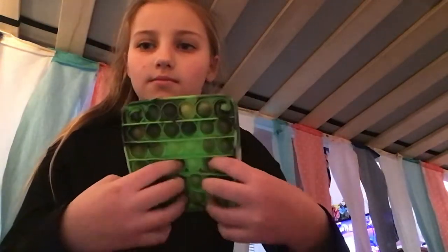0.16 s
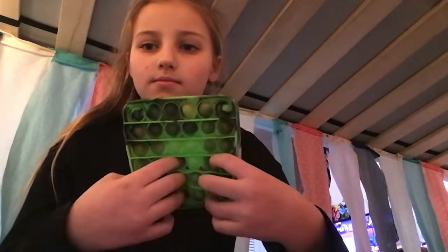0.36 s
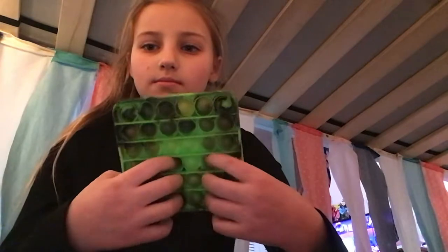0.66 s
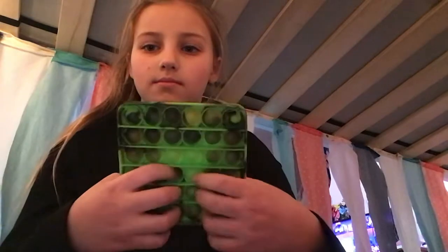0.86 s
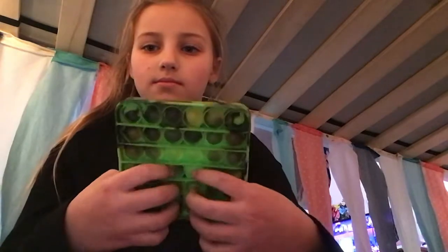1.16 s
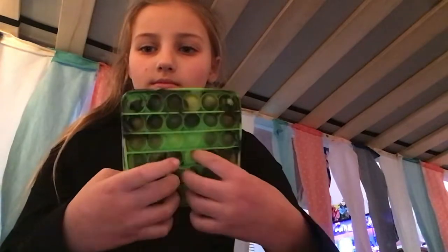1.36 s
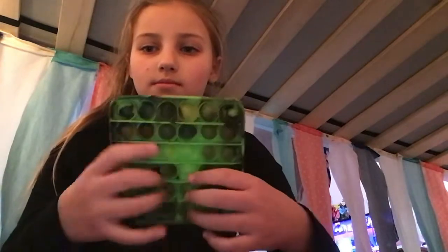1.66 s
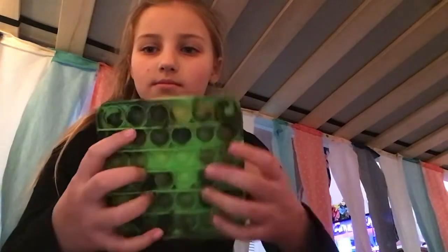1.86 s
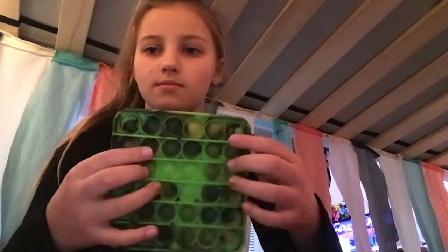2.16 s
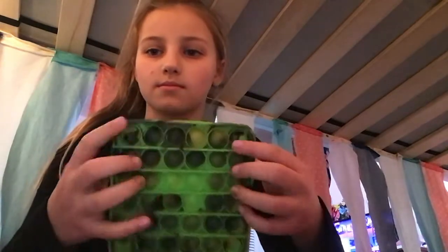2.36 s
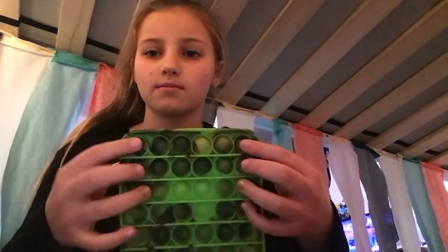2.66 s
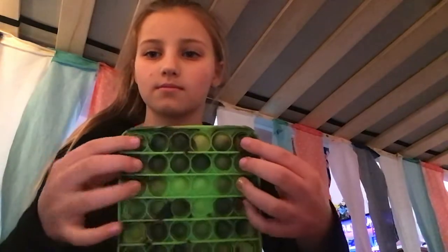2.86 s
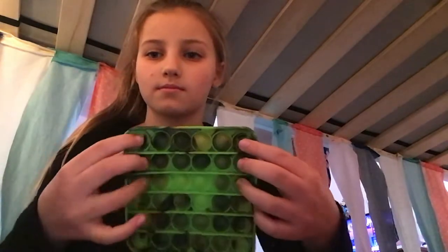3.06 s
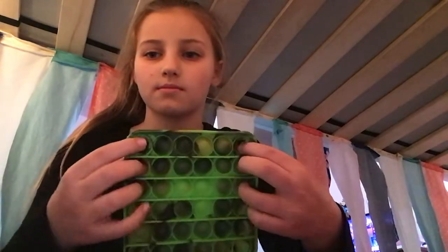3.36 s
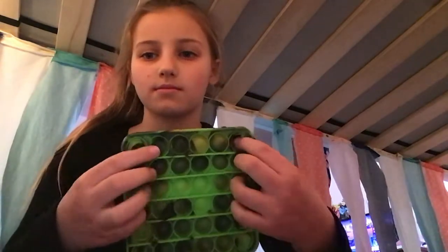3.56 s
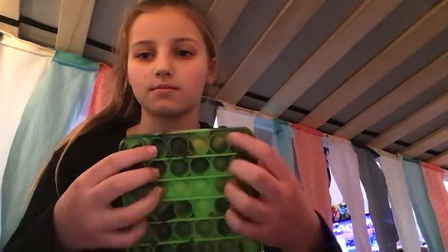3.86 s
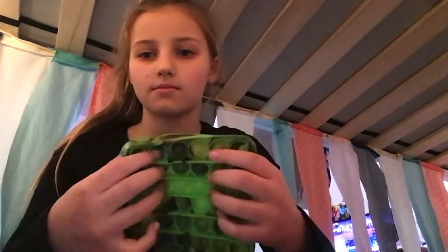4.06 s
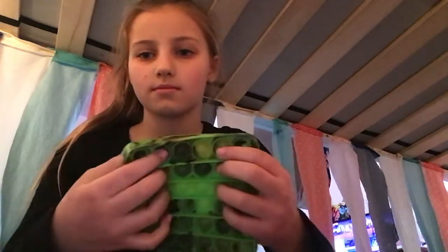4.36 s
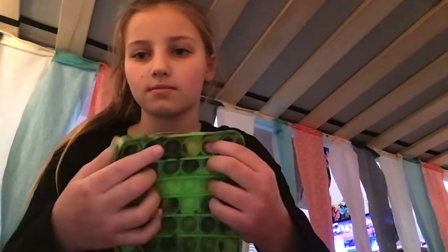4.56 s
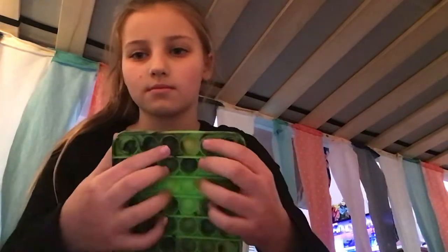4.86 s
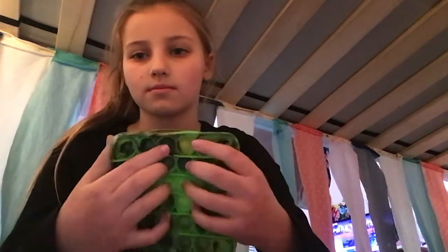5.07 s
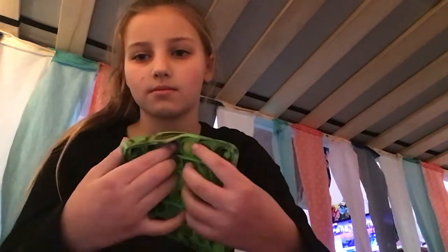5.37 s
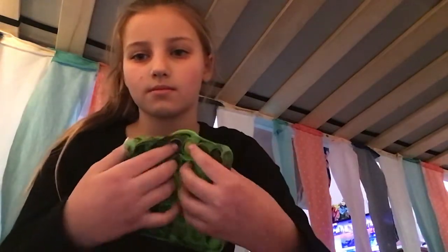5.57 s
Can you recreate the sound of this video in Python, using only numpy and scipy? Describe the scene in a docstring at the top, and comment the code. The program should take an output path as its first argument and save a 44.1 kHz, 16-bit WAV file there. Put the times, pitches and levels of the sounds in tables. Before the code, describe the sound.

A silicone bubble toy is pressed close to the microphone in a room with very little echo. Each dome gives a short, sharp, hollow pop with a slight rubbery thump. About six pops come quickly between 0.1 and 0.5 seconds, some almost on top of each other. Fingertips then slide and creak faintly on the rubber, and a double pop sounds at 1.4 seconds. Only quiet rubbing and tiny slips follow until 3 seconds. Five pops come unevenly between 3 and 3.6 seconds, then two near 4.2, three around 4.6, a tight cluster near 5.3 and a last pair at about 5.7 seconds, with faint rubbing in the gaps. A low, steady rumble, like distant machinery or traffic, and a faint hiss run underneath the whole time.

```python
"""Fingers push the domes of a silicone bubble toy inside out, close to a microphone under a low roof.
First six domes pop: each snaps through, rings for a few milliseconds and jolts the rubber sheet.
Fingers slide and creak faintly, two more domes pop near 1.4 s, and the quiet rubbing goes on.
From 3 s the pops return, mostly in small groups. All along, a low rumble of distant machinery
or traffic and the microphone's hiss lie underneath."""
import sys
import numpy as np
from scipy import signal
from scipy.fft import rfft, irfft
from scipy.io import wavfile
from scipy.ndimage import uniform_filter1d

SR = 44100
rng = np.random.default_rng(int(sys.argv[2]) if len(sys.argv) > 2 else 0)


def dump(signal):
    """Clip the signal to [-1, 1] and save it as 16-bit WAV at the path in sys.argv[1]."""
    limited = np.clip(np.atleast_2d(signal).T, -1, 1)
    pcm = np.round(limited * 32767).astype(np.int16)
    wavfile.write(sys.argv[1], SR, pcm)


N = 251811

# Domes popping: t/s, cup f/Hz, wall f/Hz, rim f/Hz, cup level/dB, wall level/dB, rim level/dB,
# ring stretch/factor, rustle level/dB, tick level/dB, crack level/dB, thump level/dB
DOME_POPS = [(0.115, 503, 1326, 1920, -30, -26, -32, 0.43, -46, -62.5, -88, -47),
             (0.317, 595, 1220, 1610, -29.5, -42, -20, 1.16, -45.5, -53, -78, -44),
             (0.3204, 665, 1510, 1730, -26.5, -27, -20, 0.69, -46, -59, -71.5, -43.5),
             (0.3889, 653, 1430, 1900, -34.5, -33, -35, 0.62, -50.5, -79, -92, -53),
             (0.4724, 487, 1350, 1790, -39.5, -28.5, -33, 0.4, -48, -56, -72, -54),
             (0.4919, 615, 1370, 1830, -30.5, -30, -28.5, 0.56, -48, -68, -80.5, -61),
             (1.3773, 522, 1202, 1670, -27.5, -29.5, -19.5, 0.45, -47.5, -59.5, -83.5, -44),
             (1.3988, 644, 1292, 2003, -25.5, -24.5, -21, 0.54, -39.5, -57, -79.5, -50.5),
             (3.0179, 450, 1050, 1770, -35.5, -33, -30.5, 0.99, -47, -62.5, -93, -67),
             (3.227, 478, 1280, 1824, -30.5, -30.5, -19.5, 0.62, -44.5, -50.5, -68, -44),
             (3.316, 538, 966, 1700, -34, -50, -37.5, 0.53, -57, -48, -74.5, -48),
             (3.3953, 543, 1460, 1716, -22.5, -51, -24.5, 0.33, -57, -60.5, -64.5, -42.5),
             (3.5848, 490, 1027, 1740, -32.5, -27.5, -30, 0.55, -43.5, -54, -57.5, -41.5),
             (4.1773, 463, 1194, 1735, -33, -27, -33.5, 0.64, -46, -61.5, -90, -51),
             (4.2205, 541, 1350, 1738, -27.5, -31, -21.5, 0.66, -45.5, -59.5, -77, -39),
             (4.5232, 410, 1150, 1860, -34.5, -53.5, -49.5, 0.73, -67.5, -50.5, -71, -48.5),
             (4.588, 607, 1260, 1950, -28.5, -25.5, -27, 0.41, -53, -53.5, -65.5, -37.5),
             (4.629, 507, 1315, 1850, -28.5, -27, -26, 0.51, -42, -54.5, -86.5, -40.5),
             (5.2873, 408, 1190, 1998, -31, -28.5, -41, 0.45, -50.5, -65, -86, -46),
             (5.3572, 580, 1330, 1570, -31.5, -29, -28.5, 1, -46, -58.5, -79, -45),
             (5.3601, 601, 1230, 1550, -28.5, -35, -27.5, 0.6, -51, -66, -81.5, -51),
             (5.6784, 593, 1470, 1710, -31.5, -33, -29, 0.83, -43, -71, -90.5, -44),
             (5.6956, 636, 1570, 1640, -27, -26.5, -29, 0.7, -47.5, -68.5, -87, -48.5)]
# Ring of cup, wall and rim before stretching: t60/s (t60 is the time to fade by 60 dB)
BASE_RING_T60 = [.025, .018, .015]
# Tone of the flapping sheet: f/Hz, level/dB
RUSTLE_TONE = [(1700, -32.5), (2300, 4), (2800, -1), (3600, 4.5), (4300, -0.5), (4900, -6), (5600, -21.5),
               (7000, -51.5)]
# Tone of skin leaving rubber: f/Hz, level/dB
TICK_TONE = [(4000, -33), (5000, 3), (6300, 2), (7000, -6.5), (8200, -23.5), (9500, -46.5)]
# Tone of the snap's sharpest edge: f/Hz, level/dB
CRACK_TONE = [(6800, -43), (7800, -4), (9000, 1.5), (11500, -2), (13500, -8), (15500, -5.5)]
# Fingertips slipping: t/s, rub level/dB, scuff level/dB, t60/s
FINGER_SLIPS = [(0.965, -66, -87.5, 0.021), (0.9975, -67, -84, 0.026), (1.016, -70, -87, 0.03),
                (1.1107, -64, -84, 0.018), (1.1229, -62, -84, 0.009), (1.587, -81, -87, 0.021),
                (1.6218, -68, -88, 0.018), (1.929, -62, -74, 0.019), (2.012, -69.5, -78, 0.024),
                (2.142, -66.5, -83, 0.008), (2.1935, -69, -90, 0.023), (3.9823, -66.5, -80, 0.03),
                (4.0132, -70, -81, 0.017), (4.494, -74.5, -75.5, 0.023), (4.803, -67.5, -88, 0.024)]
# Fingers sliding to the next dome: t/s, length/s, rub level/dB, scuff level/dB
FINGER_SLIDES = [(0.77, 0.053, -87, -95), (0.955, 0.075, -82.5, -95), (1.53, 0.17, -81.5, -91),
                 (1.78, 0.11, -82.5, -87.5), (1.915, 0.11, -86, -90), (2.06, 0.24, -88.5, -92),
                 (2.35, 0.22, -88, -96), (2.68, 0.14, -90, -96.5), (2.852, 0.032, -79.5, -81.5),
                 (3.485, 0.11, -81, -87), (3.66, 0.2, -91, -99), (3.965, 0.052, -81, -85),
                 (4.79, 0.054, -84, -99), (5.135, 0.039, -86, -91.5), (5.58, 0.16, -93, -91.5)]
# Tone of skin rubbing on rubber: f/Hz, level/dB
RUB_TONE = [(800, -8), (1200, -2), (1700, 3.5), (2100, -1), (2600, -34)]
# Tone of the scuff, the bright part of rubbing: f/Hz, level/dB
SCUFF_TONE = [(2200, -10.5), (3000, 0), (5000, 9), (6800, 7.5), (8000, -45)]
# How long the room echoes: f/Hz, t60/s
ROOM_T60 = [(300, 0.0518), (900, 0.17), (1300, 0.13), (2200, 0.13), (3000, 0.13), (5000, 0.28),
            (9000, 0.04)]
# Tone of the room's echo, slightly darker in the treble: f/Hz, level/dB
ROOM_TONE = [(300, -5.5), (1000, -3.5), (2300, -5.5), (3200, -6.5), (4200, -9.5), (8000, -8)]
# Tone of the distant rumble: f/Hz, level/dB
RUMBLE_TONE = [(15, -77), (25, -43.5), (43, -30.5), (51, -19.5), (64, -7), (81, 0.5), (93, -2.5), (108, 3),
               (132, -2), (156, -12), (204, -13), (237, -22), (275, -17), (325, -28.5), (383, -30.5),
               (438, -33.5), (900, -48.5), (1170, -75.5), (1980, -120)]
# Tone of the microphone's hiss: f/Hz, level/dB
HISS_TONE = [(290, -32.5), (500, -20), (583, 1.5), (817, -16), (1070, -8), (1110, -10.5), (1790, -9),
             (2120, -11.5), (2580, -12), (5400, -14.5), (7600, -19.5), (8390, -16), (9700, -17.5),
             (10500, -20.5), (14300, -21)]

SHORT = 2048  # samples in one short sound
LEAD_S = 0.006  # a pop or slip starts this long before its peak


def pop(cup_hz, wall_hz, rim_hz, cup_db, wall_db, rim_db, stretch, rustle_db, tick_db, crack_db,
        thump_db):
    """A dome buckles in an instant, so its cup, wall and rim start ringing together."""
    buckle_s = 0.00033
    noise_rise_s = 0.0014  # the rustle, tick and crack swell in over a millisecond or two
    thump_hz, thump_t60 = 205, 0.049
    t = np.arange(SHORT) / SR - LEAD_S
    after = np.maximum(t, 0)
    ring = np.zeros(SHORT)
    for hz, db, t60 in zip([cup_hz, wall_hz, rim_hz], [cup_db, wall_db, rim_db], BASE_RING_T60):
        ring += gain_of(db - 60 * after / (t60 * stretch)) * np.cos(2 * np.pi * hz * t)
    ring *= swell(t, buckle_s)
    ring = signal.lfilter(*signal.butter(2, 330, "high", fs=SR), ring)  # a small dome gives no bass
    ring = signal.filtfilt(*signal.butter(4, 2450, fs=SR), ring)  # soft rubber rounds off the treble
    rustle = gain_of(rustle_db) * burst(RUSTLE_TONE, noise_rise_s, t60=0.03)
    tick = gain_of(tick_db) * burst(TICK_TONE, noise_rise_s, t60=0.023)
    crack = gain_of(crack_db) * burst(CRACK_TONE, noise_rise_s, t60=0.01)
    snap = ring + rustle + tick + crack
    desk_echo = gain_of(-13.5) * np.interp(t - 0.001594, t, snap, left=0)  # about 1.6 ms late
    # The whole sheet jolts under the finger.
    thump = gain_of(thump_db - 60 * after / thump_t60) * np.sin(2 * np.pi * thump_hz * after)
    thump *= 1 - np.exp(-after / 0.00067)
    return hollow(snap + desk_echo + thump)


def hollow(x, centre_hz=866, width_hz=330, depth=0.55):
    """A dip near 870 Hz, the same for every pop, makes the pop sound hollow."""
    notched = signal.lfilter(*signal.iirnotch(centre_hz, centre_hz / width_hz, fs=SR), x)
    return (1 - depth) * x + depth * notched


def slip(rub_db, scuff_db, t60):
    """Skin sticks to the rubber, then lets go with one tiny jerk."""
    rub = gain_of(rub_db) * burst(RUB_TONE, rise_s=0.00027, t60=t60)
    scuff = gain_of(scuff_db) * burst(SCUFF_TONE, rise_s=0.00035, t60=t60)
    return rub + scuff


def slide(length_s, rub_db, scuff_db):
    """A sliding finger rubs in uneven grains a few milliseconds long."""
    count = round(length_s * SR)
    wobble = uniform_filter1d(uniform_filter1d(rng.standard_normal(count), 300), 300)
    grains = unit_level(gain_of(5.3 * unit_level(wobble)))
    rub = gain_of(rub_db) * noise(RUB_TONE, count)
    scuff = gain_of(scuff_db) * noise(SCUFF_TONE, count)
    fade_in_out = signal.windows.tukey(count, 0.34)
    return grains * (rub + scuff) * fade_in_out


def near_scatter(x, level_db=-17.5, t60=0.032):
    """Many weak, quick echoes off the hands and the toy roughen each sound."""
    t = np.arange(SHORT) / SR
    fade_in = 1 - np.exp(-t / 0.005)
    echoes = rng.standard_normal(SHORT) * fade_in * gain_of(-60 * t / t60)
    return gain_of(level_db) * signal.fftconvolve(x, echoes / np.linalg.norm(echoes))[:N]


def room_echo(x, gap_s=0.02):
    """Roof and walls answer after a short gap; each pitch range fades at its own speed."""
    hz, frame_s, bands = signal.stft(rng.standard_normal(SR // 4), SR, nperseg=256)
    fades = gain_of(-60 * frame_s / look_up(ROOM_T60, hz)[:, None])
    _, tail = signal.istft(bands * fades, SR, nperseg=256)
    t = np.arange(len(tail)) / SR
    tail *= 1 - np.exp(-(t / gap_s) ** 4)
    tail = colour(tail / np.linalg.norm(tail), ROOM_TONE)
    return gain_of(-27.5) * signal.fftconvolve(x, tail)


def rumble(level_db=-51.5):
    """Distant machinery or traffic makes a steady, deep noise."""
    return gain_of(level_db) * noise(RUMBLE_TONE, N)


def hiss(level_db=-82):
    """The microphone adds its own faint noise, which drops steeply near 14.5 kHz."""
    return gain_of(level_db) * noise(HISS_TONE + [(14500, -48)], N)


def burst(tone, rise_s, t60):
    """A short puff of noise that swells until LEAD_S, then fades."""
    t = np.arange(SHORT) / SR - LEAD_S
    shape = swell(t, rise_s) * gain_of(-60 * np.maximum(t, 0) / t60)
    puff = colour(rng.standard_normal(SHORT) * shape, tone)
    return unit_level(puff) * np.sqrt(np.mean(shape ** 2))


def swell(t, rise_s):
    """Rises smoothly to 1 at t = 0 and stays there."""
    return np.exp(-np.minimum(t, 0) ** 2 / (2 * rise_s ** 2))


def noise(tone, count):
    """Steady noise with the given tone, at level 1."""
    return unit_level(colour(rng.standard_normal(count), tone))


def colour(x, tone):
    """Turns each frequency up or down as a tone table says."""
    hz = np.fft.rfftfreq(len(x), 1 / SR)
    return irfft(rfft(x) * gain_of(look_up(tone, hz)), len(x))


def look_up(table, hz):
    """Reads between a table's rows along a pitch (log-frequency) scale."""
    row_hz, values = np.transpose(table)
    return np.interp(np.log(hz + 1), np.log(row_hz + 1), values)


def gain_of(db):
    """Turns decibels into a factor."""
    return 10 ** (np.asarray(db) / 20)


def unit_level(x):
    """Scales a sound to an average (rms) level of 1."""
    return x / np.sqrt(np.mean(x ** 2) + 1e-20)


def add(mix, start_s, sound):
    """Mixes a sound in at the given time."""
    part = mix[round(start_s * SR):][:len(sound)]
    part += sound[:len(part)]


def scene():
    """The toy and its echoes over rumble and hiss, in one channel."""
    toy, echoes = np.zeros(N), np.zeros(N)
    sounds = [(t - LEAD_S, pop(*row)) for t, *row in DOME_POPS]
    sounds += [(t - LEAD_S, slip(*row)) for t, *row in FINGER_SLIPS]
    sounds += [(t, slide(*row)) for t, *row in FINGER_SLIDES]
    for start_s, sound in sounds:
        add(toy, start_s, sound)
        add(echoes, start_s, room_echo(sound))  # the toy keeps moving, so no two echoes are alike
    background = rumble() + hiss()
    return (toy + near_scatter(toy) + echoes + background)[None]


def record(dry):
    """Cuts off the very highest treble."""
    top_hz = 15640
    low_pass = signal.firwin(511, top_hz, window=("kaiser", 9), fs=SR)
    return signal.oaconvolve(dry, low_pass[None], "same")


dry = scene()
out = record(dry)
dump(out)
```